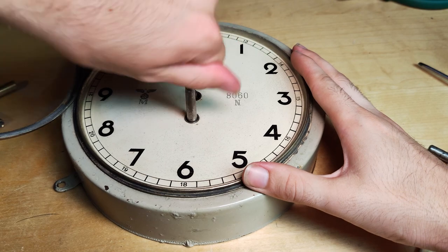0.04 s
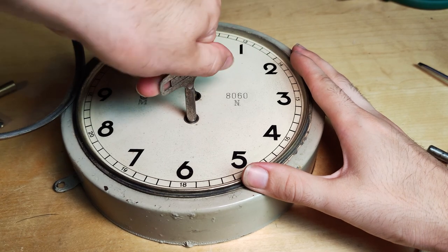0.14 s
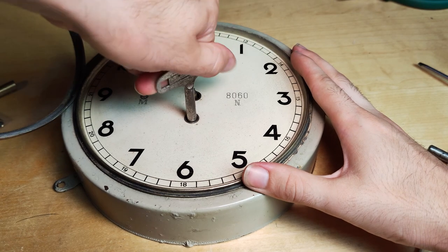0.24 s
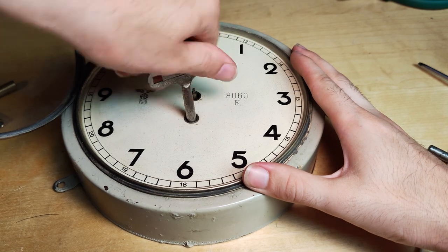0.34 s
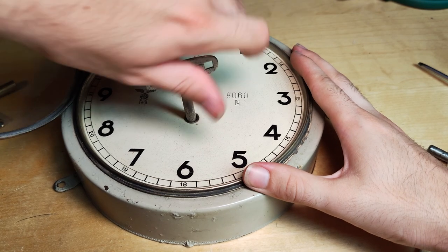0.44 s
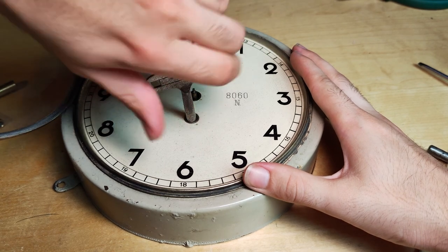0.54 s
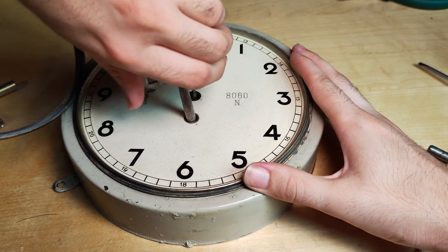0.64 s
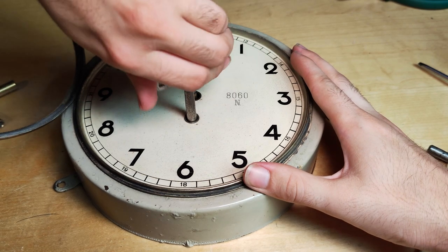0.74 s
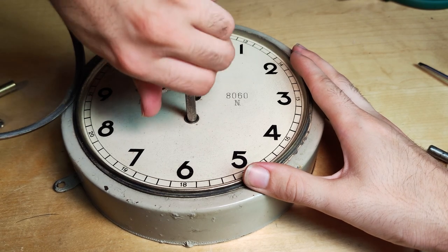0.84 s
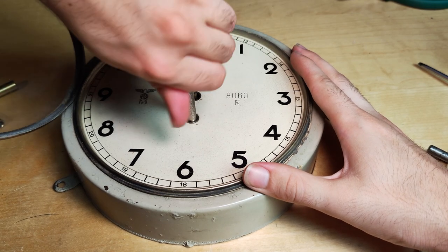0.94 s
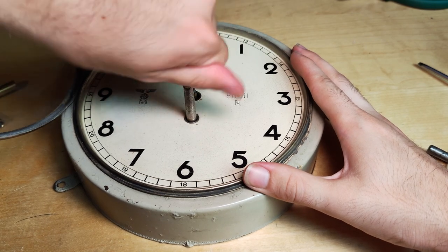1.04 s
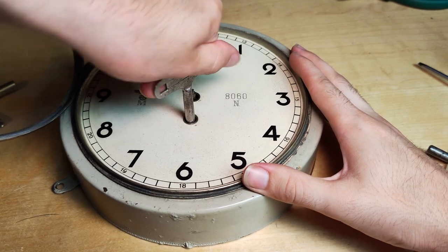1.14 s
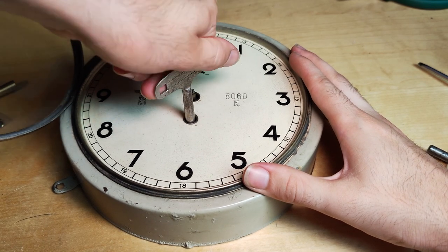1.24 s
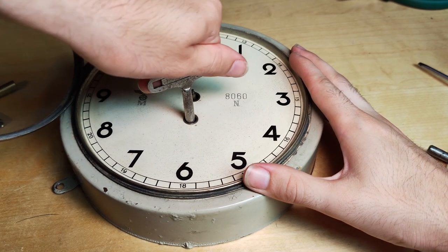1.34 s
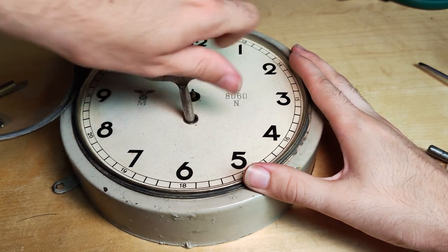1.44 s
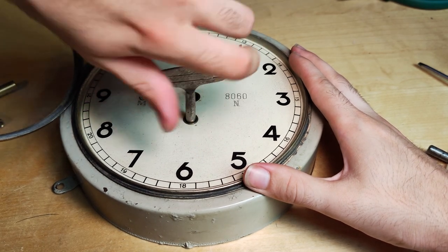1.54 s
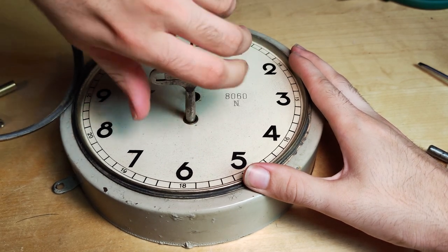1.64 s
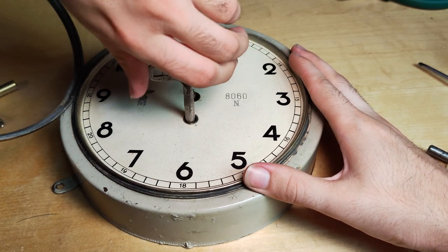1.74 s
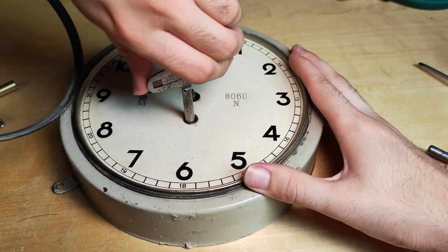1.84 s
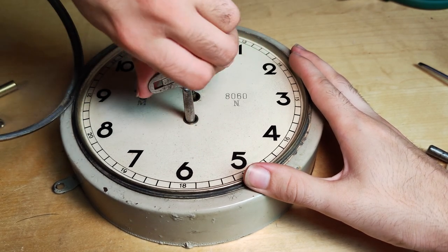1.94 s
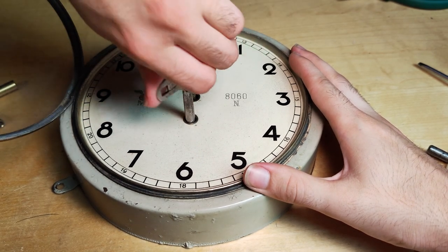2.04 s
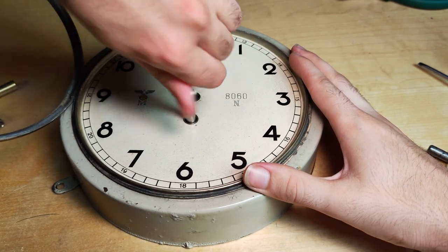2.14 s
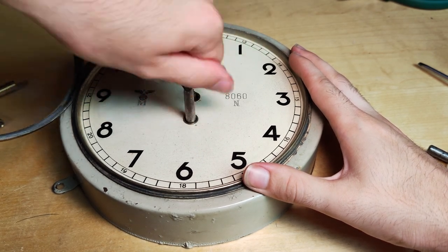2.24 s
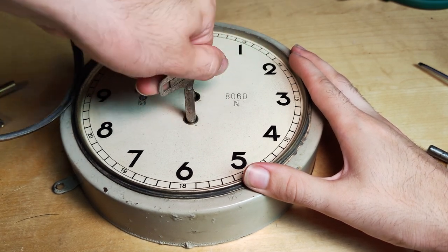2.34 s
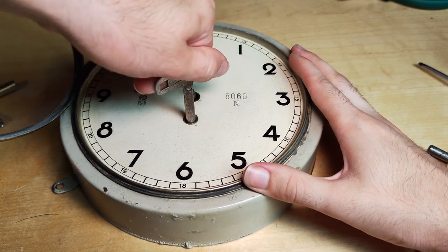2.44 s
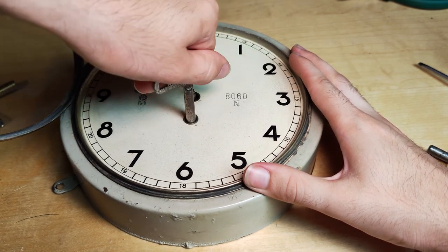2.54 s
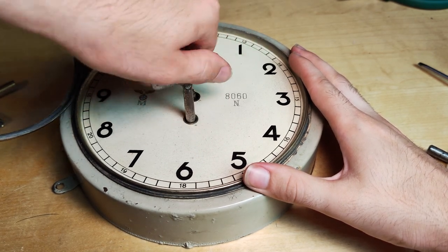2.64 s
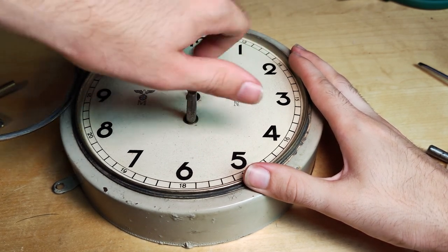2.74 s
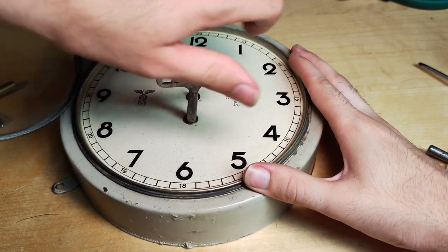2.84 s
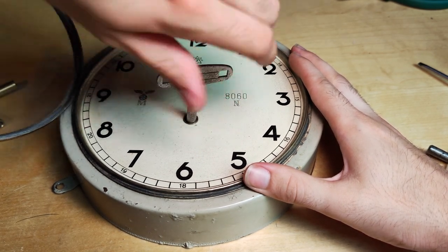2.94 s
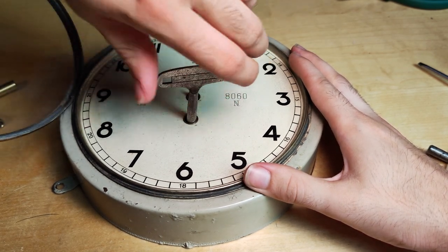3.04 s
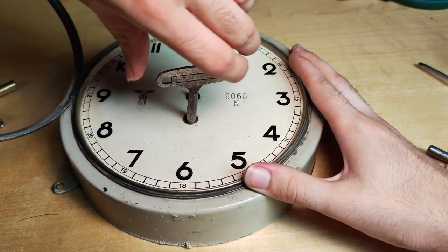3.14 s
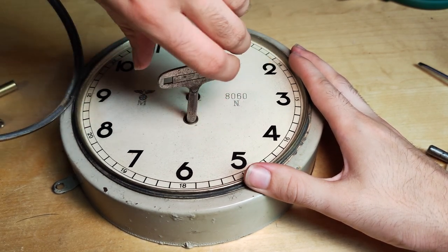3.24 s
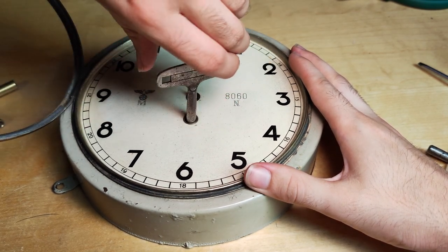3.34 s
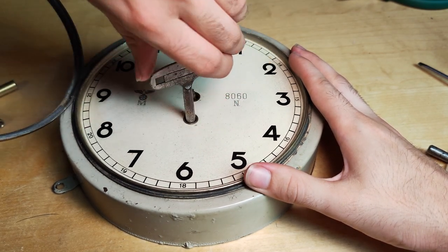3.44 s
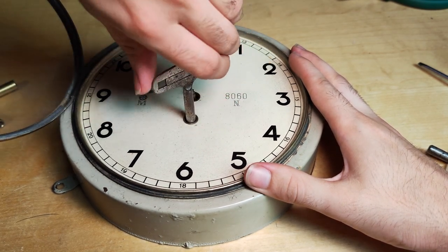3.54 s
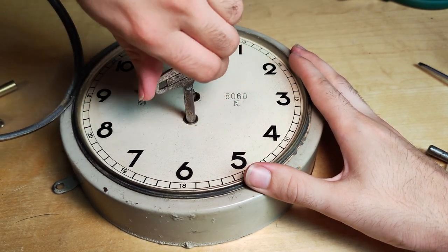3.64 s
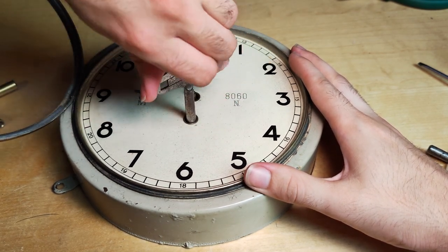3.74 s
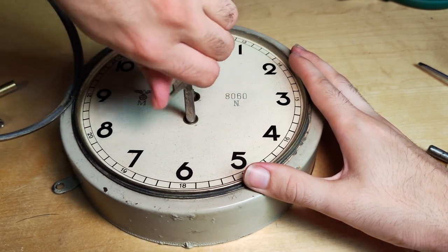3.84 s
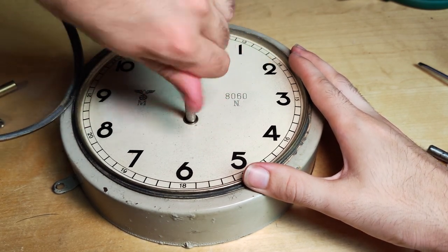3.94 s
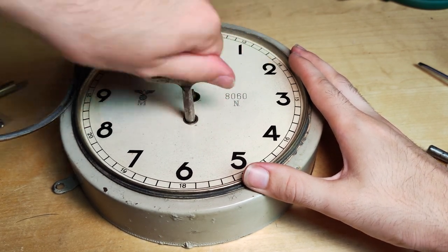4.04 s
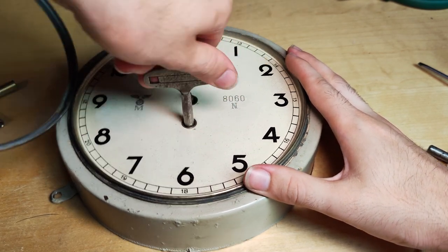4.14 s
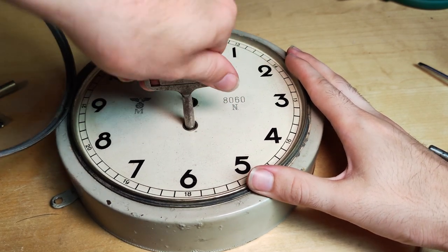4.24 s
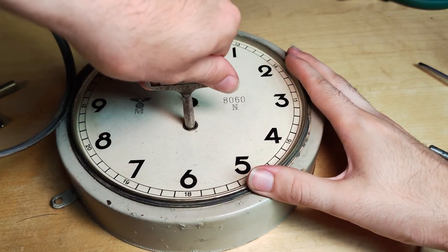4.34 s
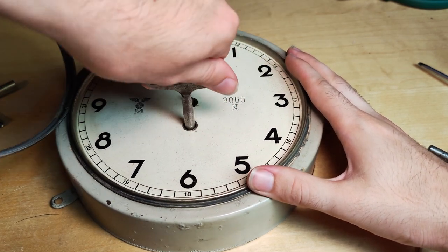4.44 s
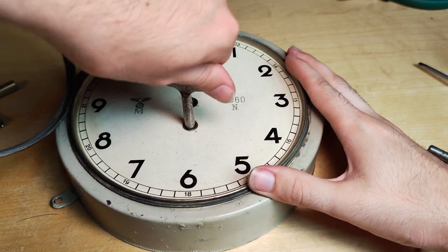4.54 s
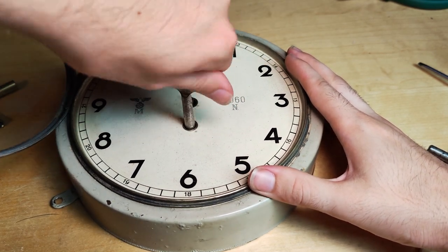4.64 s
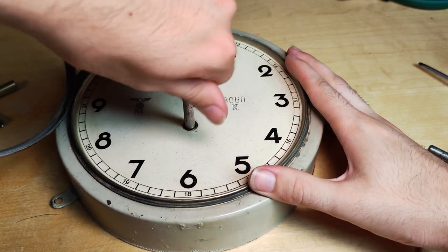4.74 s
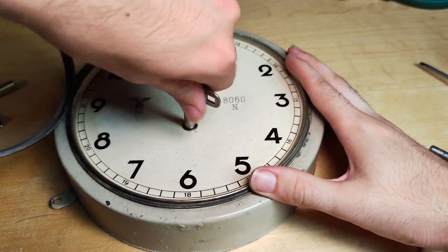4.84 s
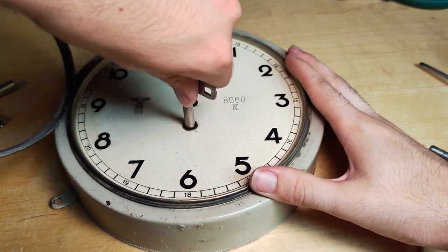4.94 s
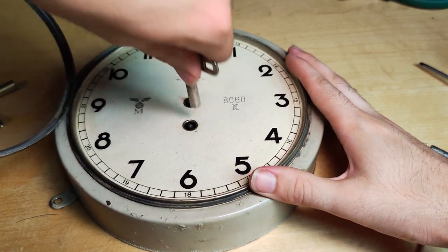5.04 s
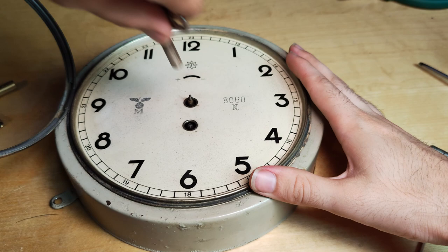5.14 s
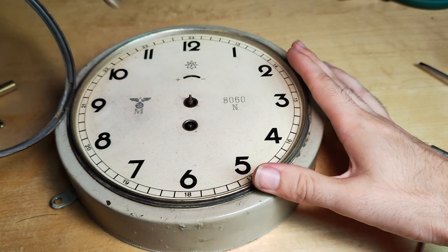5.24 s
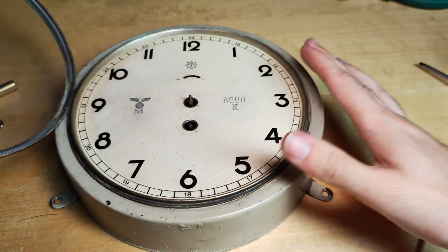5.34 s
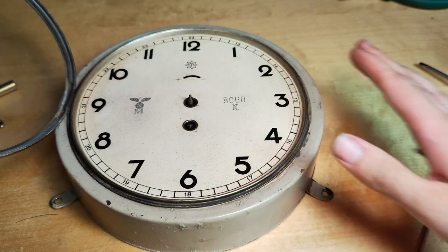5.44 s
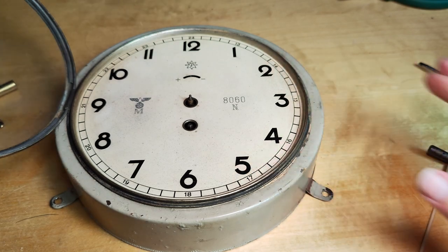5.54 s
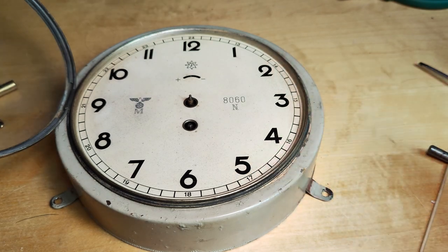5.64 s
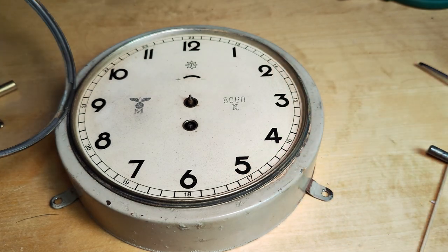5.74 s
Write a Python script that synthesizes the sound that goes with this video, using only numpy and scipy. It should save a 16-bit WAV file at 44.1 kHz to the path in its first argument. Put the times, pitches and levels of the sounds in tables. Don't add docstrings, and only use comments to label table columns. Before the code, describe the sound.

A key winds a metal wall clock in four quick ratchet bursts, with recoil clacks, finger knocks and brief rubbing in a quiet room.

```python
import sys
import numpy as np
from scipy import signal
from scipy.fft import rfft, irfft
from scipy.io import wavfile
from scipy.ndimage import uniform_filter1d

SR = 44100
rng = np.random.default_rng(int(sys.argv[2]) if len(sys.argv) > 2 else 0)


def amp(db):
    return 10 ** (np.asarray(db, float) / 20)


def write(x):
    x = np.atleast_2d(x).T
    wavfile.write(sys.argv[1], SR, np.round(np.clip(x, -1, 1) * 32767).astype(np.int16))


N = 255780
RING = 6144
DIAL_LEAD_US = 131
SNAP_TILT_DB = 5

# hz, alike (0-1)
ALIKE = [(30, 1), (130, 1), (300, 0.95), (700, 0.73), (1100, 0.83), (1500, 0.63), (2200, 0.21), (15000, 0)]


def pawl(case, dial, plates, wheels):
    # start_s, dial peak level_db, wheels_db re dial, case_db re dial
    snaps = [(0.012, -32, -2.5, -8), (0.053, -26.5, -13, -13), (0.087, -25, -9, -20.5),
             (0.113, -24, -8, -19), (0.136, -26, -6.5, -13.5), (0.159, -26, -4.5, -13.5),
             (0.186, -25.5, -8.5, -17), (0.234, -27.5, -11.5, -12.5), (1.011, -23, -15, -15),
             (1.067, -21, -14, -19), (1.1, -26.5, -7.5, -16), (1.127, -24.5, -9.5, -19.5),
             (1.153, -29.5, -4, -8.5), (1.185, -23.5, -11.5, -19.5), (1.225, -26, -12, -10),
             (2.162, -29.5, -7.5, -17), (2.224, -28, -8.5, -11.5), (2.258, -23.5, -8, -18),
             (2.286, -24.5, -11.5, -16.5), (2.315, -25, -8.5, -17), (2.346, -22, -10, -16.5),
             (2.381, -23, -11, -19), (2.426, -23.5, -12.5, -12), (3.966, -24.5, -14, -15),
             (4.022, -22.5, -15, -17.5), (4.063, -22.5, -13.5, -15), (4.105, -23.5, -11.5, -14),
             (4.134, -27, -3.5, -7.5)]
    # pitch_hz, level_db, t60_s
    pawl_modes = [(3325, 0, .035), (3393, -2, .035), (4620, -5, .03), (5725, -6, .025), (8035, -2, .03),
                  (10317, -5, .025), (14200, 3, .035)]
    s, db, jingle, low = np.transpose(snaps)
    more_jingle = jingle - jingle.mean()
    pan = 0.5 + 0.047 * more_jingle
    plates_db = -29.5 + 0.29 * (db - db.mean())
    boom = strike(dial, s - .001, db + 1.0, pan, 3.06, 2, .3, slope(dial, SNAP_TILT_DB),
                  damp_s=0.11, crack_db=15.5, crack_ms=2.8, lead_us=DIAL_LEAD_US)
    spring = strike(rings(*np.transpose(pawl_modes)), s, db - 14 + 0.49 * more_jingle, pan, 0.39, 3.2, 2.4)
    clack = strike(plates, s, plates_db, pan - 1.5, 1.0, 0.25, 1.95,
                   crack_db=10.0, crack_ms=1.34, bounce_ms=2.4, bounce_db=-8.5)
    jangle = strike(wheels, s - .001, db + jingle + 9, pan + 1.4, 0.32, 0.97, 1.54,
                    crack_db=-2.5, crack_ms=1.7, bounce_db=-1.0)
    thud = strike(case, s, db + low + 2.0, 0 * s, 1.0, 4.1, 0.7, slope(case, 4.9, 400))
    return boom + spring + clack + jangle + thud


def backlash(case, dial, plates, wheels):
    # start_s, dial peak level_db, wheels_db re dial, case_db re dial
    recoils = [
        (0.315, -28.5, -14, -5.5),
        (0.925, -27.5, -19.5, -6.5),
        (1.337, -28, -18.5, -6.5),
        (1.52, -38.5, -17, 5),
        (2.051, -31.5, -20.5, -5),
        (2.514, -27.5, -16.5, -6),
        (3.843, -29.5, -23, -7.5),
        (4.423, -44, -17, -6.5),
    ]
    s, db, jingle, low = np.transpose(recoils)
    s, pan = s - .0015, 0.9 + 0 * s
    boom = strike(dial, s, db + 0.42, pan, 3.7, 2.2, 1.3, slope(dial, 2 * SNAP_TILT_DB),
                  damp_s=0.084, bounce_ms=2.2, bounce_db=-24.0, lead_us=DIAL_LEAD_US)
    clack = strike(plates, s, db + 2, pan - 1.5, 3.1, 1.0, 5.52,
                   crack_db=6.5, crack_ms=3.8, bounce_ms=1.9, bounce_db=-8.5)
    jangle = strike(wheels, s, db + jingle + 9.5, pan + 2.0, 2.15, 1.2, 3.43,
                    crack_db=-11.0, crack_ms=4.1, bounce_ms=3.6, bounce_db=-2.5)
    thud = strike(case, s, db + low - .3, 0 * s, 3.9, 3.4, 0.61, slope(case, 15.4, 500), damp_s=0.29)
    return boom + clack + jangle + thud


def fingers(case, dial, plates, bench):
    # start_s, case peak level_db, dial_db re case, case pitch_hz, hand damping t60_s
    thuds = [(0.449, -43.5, -6, 355, 0.33), (0.636, -49, -4, 434, 0.12), (0.67, -27.5, -13, 420, 0.23),
             (0.68, -35, -30, 273, 0.5), (0.93, -37, -34, 270, 0.46), (2.83, -41, -30, 265, 0.49),
             (0.715, -35.5, -9.5, 260, 1), (0.865, -30.5, -30, 327, 0.23), (1.555, -25, -8.5, 367, 0.23),
             (1.599, -30, -10, 287, 1), (1.677, -28, -17, 424, 0.18), (1.786, -45, -2.5, 395, 0.43),
             (1.815, -28.5, -30, 350, 0.99), (2.715, -41, -7, 250, 0.064), (2.812, -27, -13, 460, 0.53),
             (3.443, -45, -26, 393, 0.18), (3.595, -32, -23, 358, 0.99), (4.149, -27.5, -8, 252, 0.16),
             (4.673, -35.5, -6, 394, 0.13), (4.766, -45, -9, 425, 0.17), (4.89, -41.5, -10, 282, 0.095)]
    # start_s, case peak level_db, dial_db re case, plates_db re case, case pitch_hz
    taps = [(0.385, -41.5, 7, -1.5, 397), (0.507, -44, -4, -3.5, 366), (0.848, -37, -1.5, -11, 400),
            (1.394, -35.5, 1, -4.5, 383), (1.809, -36, -0.5, -8, 434), (1.952, -34, -6.5, -13, 244),
            (2.596, -44, 10, -2, 427), (2.801, -39.5, 6, -3, 444), (4.556, -38.5, -0.5, -8.5, 435),
            (4.823, -54, 0, -17, 436), (4.939, -46.5, 0.5, -7, 394), (4.992, -46, 8, -14, 614),
            (5.035, -39, 3.5, -6, 765), (5.055, -34.5, -1.5, -13, 720), (5.36, -54, -19, 2, 388)]
    soft = [(s, db, mid, -17.5 + 0.42 * mid, hz, damp) for s, db, mid, hz, damp in thuds]
    hard = [(*tap, 0.2) for tap in taps]
    s, db, mid, bright, hz, damp = np.transpose(soft + hard)
    place_db = -30 * np.log2(case[0] / hz[:, None]) ** 2
    knock = strike(case, s, db, 0 * s - .6, 2.11, 3.1, 0.64, place_db, damp)
    ring = strike(dial, s, db + mid, 0 * s, 0.3, 2.4, 0.82, damp_s=0.095, bounce_ms=2.96, bounce_db=-1.5)
    click = strike(plates, s, db + bright, 0 * s, 0.28, 3.3, 0.95, slope(plates, -12.5),
                   damp_s=1.0, bounce_ms=3.7, bounce_db=-14)
    return knock + ring + click + strike(bench, s, db - 26.5, 0 * s - 1.2, 7.6, 2.8, 1.4)


def key():
    # start_s, peak level_db, pitch_hz
    knocks = [(0.402, -38.5, 2000), (1.527, -30.5, 1120), (1.584, -43, 1970), (1.566, -40, 1300),
              (1.597, -43, 1350), (1.677, -51, 1410), (1.688, -46, 900), (1.953, -37, 560),
              (2.716, -48, 760), (3.598, -54, 1450), (4.558, -42.5, 1870), (4.612, -52, 1250),
              (4.826, -48, 1880), (4.943, -49, 1880), (5.048, -37, 700), (5.061, -46, 950),
              (5.075, -45, 990), (5.332, -45, 6000)]
    s, db, pitch_hz = np.transpose(knocks)
    pitch_hz = pitch_hz[:, None]
    hz = np.geomspace(500, 12000, num=90)
    body = rings(hz, 0 * hz, 0.056 * (1000 / hz) ** 0.77)
    narrowness = 70 * np.minimum(2500 / pitch_hz, 1) ** 2
    return strike(body, s, db, 0 * s, 0.3, 5.0, 1.0, -narrowness * np.log2(hz / pitch_hz) ** 2)


def rubbing(case, dial, plates, wheels, bench, slips_per_s=1700, spots=4):
    # peak_s, swell_s, fade_s, case level_db, dial_db re case
    rubs = [(.36, 0.1, 0.25, -47.5, -23), (0.51, 0.0051, 0.017, -39, -22), (.83, .01, 0.032, -53, -15),
            (.88, 0.066, 0.018, -48, -18), (0.923, 0.017, .005, -42, -16), (1.402, 0.0065, 0.011, -43, 2),
            (1.429, 0.17, 0.0095, -45, -18), (1.573, 0.0044, 0.022, -46.5, 1),
            (1.615, 0.12, 0.018, -35.5, -36), (1.812, 0.039, 0.046, -43.5, -23),
            (1.962, 0.0016, 0.012, -34, -38), (2.036, 0.022, 0.0042, -51, -30),
            (2.508, 0.011, 0.0035, -45.5, -6), (2.722, 0.021, 0.016, -43, -49),
            (2.783, 0.013, 0.0075, -59, -9), (3.365, .01, 0.027, -57.5, -11),
            (3.444, 0.037, 0.026, -52.5, -55), (3.954, 0.021, .003, -42.5, -19),
            (4.22, 0.034, 0.1, -38, -14.5), (4.255, 0.037, 0.028, -44.5, -9), (4.818, 0.053, 0.16, -58, -8),
            (4.904, 0.13, 0.02, -51, -29), (5.057, 0.053, 0.032, -45, -0.5),
            (5.358, 0.051, 0.031, -60, -15)]
    # peak_s, swell_s, fade_s, bench level_db
    shifts = [(.36, 0.1, 0.11, -43.5), (.47, 0.092, 0.024, -42), (1.379, 0.0069, .015, -42),
              (1.47, 0.029, 0.026, -41), (1.573, 0.0041, 0.024, -32), (1.87, 0.061, 0.04, -37.5),
              (1.96, 0.0071, 0.11, -38), (2.508, 0.013, 0.0029, -33.5), (2.714, 0.018, 0.026, -35),
              (3.365, .01, .03, -57), (3.444, 0.047, 0.033, -48), (3.955, .01, .003, -59),
              (4.34, 0.028, .03, -58), (4.906, 0.24, 0.036, -52)]
    *shape, db, mid = np.transpose(rubs)
    *shift_shape, shift_db = np.transpose(shifts)
    bright = db - 10 + 0.55 * mid
    layers = [(case, swells(*shape, db - 1), 1.0),  # body, effort, tilt in dB per octave
              (dial, swells(*shape, db + mid + 6), -36),
              (plates, swells(*shape, bright + 1), -16.5),
              (wheels, swells(*shape, bright + 1.5), -17.0),
              (bench, swells(*shift_shape, shift_db - 7.5), 7.5)]
    chance = rng.random((4, N))
    sizes = amp(-2.5 * np.log(chance[1] + 1e-9))
    slips = (chance[0] < slips_per_s / SR) * sizes * np.sign(chance[2] - .5)
    slips = slips / np.std(slips)
    place = (chance[3] * spots).astype(int)
    out = 0
    for body, effort, tilt_db in layers:
        for spot in range(spots):
            ring = strike(body, np.zeros(1), [0], [0], .5, 2, 3.0, slope(body, tilt_db), damp_s=.12)[:, :RING // 2]
            ring = ring / np.sqrt(np.sum(ring ** 2) / 2)
            drive = slips * effort * (place == spot)
            out = out + signal.oaconvolve(drive[None], ring)[:, :N]
    return out


def escapement(plates, wheels):
    # start_s, wheels peak level_db, plates_db re wheels
    ticks = [(0.5035, -62, 8), (0.682, -61.5, 13), (0.8495, -67, 15.5), (4.557, -57, 4),
             (1.5812, -58.5, 21), (1.725, -62.5, 12.5), (1.9874, -54, 7.5), (2.636, -63.5, 10),
             (2.861, -50.5, 3), (3.0838, -56.5, 8.5), (3.3246, -50.5, 5.5), (3.549, -61, 12),
             (3.803, -54.5, 2), (4.7003, -53, 2), (4.8928, -60.5, 8.5), (5.12, -50, 2.5),
             (5.3524, -54.5, 4), (5.5914, -49.5, 3.5)]
    s, db, clack = np.transpose(ticks)
    pan = 0 * s - 1.5
    return (strike(wheels, s, db + 3, pan, .3, 3.0, 3.0, crack_db=3, bounce_ms=4.0, bounce_db=-3)
            + strike(plates, s, db + clack - 2.0, pan, 0.34, 2.3, 1.0, slope(plates, 4.8),
                     bounce_ms=1.3, bounce_db=-16.0))


def strike(body, times, db, pan_db, rise_ms, scatter_db, loose, colour_db=0, damp_s=9, crack_db=-40,
           crack_ms=3, bounce_ms=0.99, bounce_db=-40, lead_us=0):
    (hz, bank), t = body, np.arange(RING) / SR
    chance, bounces = rng.standard_normal((len(times), 3, len(hz))), rng.random((len(times), 2, 3))
    patches = np.sqrt(15) * uniform_filter1d(chance[:, 0], size=15) * (len(hz) > 100)
    weight_db = scatter_db * chance[:, 0] + 1.8 * patches + colour_db
    common = amp(weight_db) * np.exp(1j * loose * chance[:, 1])
    spread = np.sqrt(-.5 * np.log(np.clip(read(ALIKE, hz), .01, .99)))
    apart = spread * chance[:, 2] + np.pi * hz * lead_us / 10 ** 6
    ports = np.imag(np.array([(common * np.exp(s * 1j * apart)).astype(np.complex64) @ bank for s in (1, -1)]))
    push = 1 - np.exp(-(t * 1000 / rise_ms) ** 2)
    crack = 1 + amp(crack_db) * np.exp(-t * 1000 / crack_ms)
    damping = 10 ** (-3 * t / np.maximum(np.reshape(damp_s, (-1, 1)), .02))
    ports = ports * (push * crack) * damping
    out = np.zeros((2, N + 2 * RING))
    for k, s in enumerate(times):
        lags = (np.cumsum(0.27 + bounces[k, 0]) * bounce_ms * SR / 1000).astype(int)
        sizes = amp(bounce_db * (np.arange(3) + 2 * bounces[k, 1]))
        ring = ports[:, k].copy()
        for size, lag in zip(sizes, lags):
            ring += size * np.pad(ports[:, k], ((0, 0), (lag, 0)))[:, :RING]
        gain = amp(db[k] + np.array([[.5], [-.5]]) * pan_db[k]) / np.abs(ring).max(axis=1).mean()
        start = int(s * SR)
        out[:, start:start + RING] += ring * gain
    return out[:, :N]


def swells(s, swell_s, fade_s, db):
    t, out = np.arange(N) / SR, np.zeros(N)
    for k in range(len(s)):
        up, down = max(swell_s[k], .002), max(fade_s[k], .002)
        near = slice(max(int((s[k] - 2 * up) * SR), 0), int((s[k] + 2 * down) * SR))
        out[near] += amp(db[k] - 20 * np.maximum((s[k] - t[near]) / up, (t[near] - s[k]) / down))
    return out


def rings(hz, db, t60):
    t = np.arange(RING) / SR
    decay = np.exp(np.outer(2j * np.pi * hz - np.log(1000) / t60, t))
    return hz, (amp(db)[:, None] * decay).astype(np.complex64)


def crowd(lo_hz, hi_hz, count, fade_db):
    # pitch_hz, level_db per Hz
    movement_colour = [(940, -34), (1600, -10), (2500, -2.5), (2800, -2), (3260, -2), (3730, -3),
                       (4510, -6), (6350, -8), (7530, -10), (8200, -4.5), (10900, -3), (14000, -1),
                       (14600, -15), (15500, -12)]
    hz = lo_hz + (hi_hz - lo_hz) * (np.arange(count) + rng.random(count)) / count
    t60 = read([(2000, 0.14), (14000, 0.026)], hz)
    return hz, read(movement_colour, hz) + np.minimum(fade_db * np.log2(hz / 5500), 0), t60


def slope(body, db_per_octave, pivot_hz=5000):
    return np.reshape(db_per_octave, (-1, 1)) * np.log2(body[0] / pivot_hz)


def read(table, hz):
    table_hz, values = np.transpose(table)
    return np.interp(np.log(np.maximum(hz, 1)), np.log(table_hz), values)


def room(x):
    t = np.arange(SR // 2) / SR
    noise = irfft(stereo(count=len(t), alike_share=0.71)[1], len(t))
    dull = uniform_filter1d(noise, size=15)
    bass_t60_s, treble_t60_s = 0.2, 0.3
    tail = dull * 10 ** (-3 * t / bass_t60_s) + 0.59 * (noise - dull) * 10 ** (-3 * t / treble_t60_s)
    tail = tail * (1 - np.exp(-t / 0.0016))
    tail = tail / np.sqrt(np.sum(tail ** 2) / 2)
    return signal.fftconvolve(x, tail, axes=-1)[:, :N] * amp(-9.5)


def air():
    # pitch_hz, level_db per Hz
    air_colour = [(12, -67), (20, -20.5), (93, -2.5), (141, 1.5), (180, -3.5), (251, -7), (288, -0.5),
                  (447, -12), (889, -14.5), (1820, -19), (2270, -21.5), (2820, -23), (7000, -33),
                  (8960, -32), (14300, -24)]
    hz, pair = stereo(count=N, alike_share=0.41)
    pair = irfft(pair * amp(read(air_colour, hz)) * (hz < 14400), N)
    return pair / np.std(pair.mean(axis=0)) * amp(-63)


def stereo(count, alike_share):
    hz = np.fft.rfftfreq(count, 1 / SR)
    mid, side = rfft(rng.standard_normal((2, count)))
    alike = np.clip(read(ALIKE, hz) * alike_share, 0, 1)
    mid, side = mid * np.sqrt(1 + alike), side * np.sqrt(1 - alike)
    return hz, np.array([mid + side, mid - side])


def scene():
    # pitch_hz, level_db, t60_s
    case_modes = [(186, -12, .13), (220, -10, .12), (250, -5, .13), (275, -4, .14), (315, -7, .11),
                  (355, -4, .12), (385, -5, .11), (411, 0, .13), (460, -7, .1), (500, -6, .11),
                  (530, -6, .11), (591, -7, .11), (667, -13, .08), (740, -17, .08)]
    # pitch_hz, level_db, t60_s
    dial_modes = [(790, -20, .07), (850, -16, .07), (915, -8, .08), (972, -7, .07), (1044, -1, .09),
                  (1088, 0, .08), (1140, -4, .07), (1208, -3, .07), (1255, -5, .06), (1297, -2, .08),
                  (1355, -6, .07), (1419, -6, .09), (1490, -16, .06)]
    # pitch_hz, level_db, t60_s
    bench_modes = [(98, -43, 0.11), (128, 22, 0.4), (160, -10, 0.054), (174, 17.5, 0.86)]
    case, dial, bench = [rings(*np.transpose(modes)) for modes in (case_modes, dial_modes, bench_modes)]
    plates = rings(*crowd(1500, 8000, count=300, fade_db=0))
    wheels = rings(*crowd(3000, 14600, count=400, fade_db=10.5))
    clock = pawl(case, dial, plates, wheels) + backlash(case, dial, plates, wheels)
    clock = clock + fingers(case, dial, plates, bench) + key()
    clock = clock + rubbing(case, dial, plates, wheels, bench) + escapement(plates, wheels)
    clock = signal.sosfilt(signal.butter(4, 95, "high", fs=SR, output="sos"), clock)
    return clock + room(clock) + air()


def top_cut(x):
    return signal.sosfilt(signal.butter(12, 15750, fs=SR, output="sos"), x)


def record(dry):
    return top_cut(dry)


dry = scene()
out = record(dry)
write(out)
```